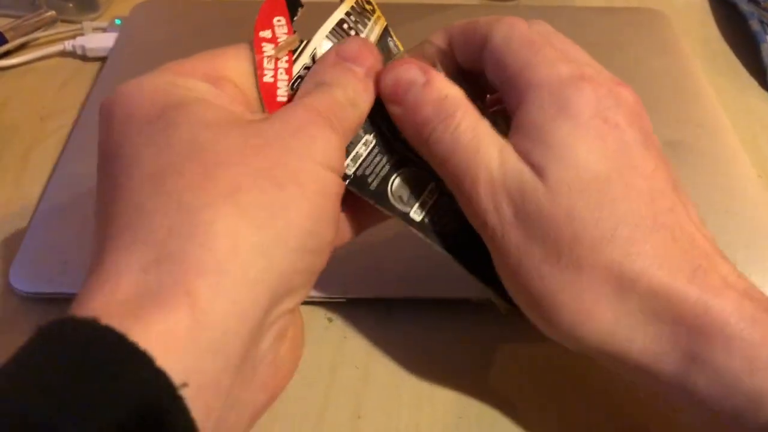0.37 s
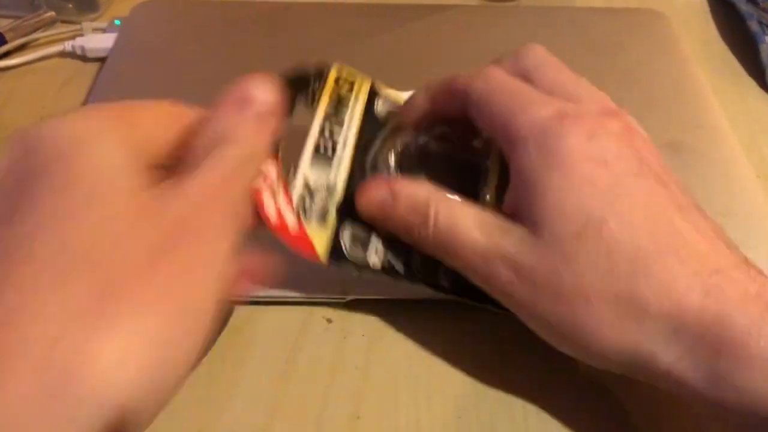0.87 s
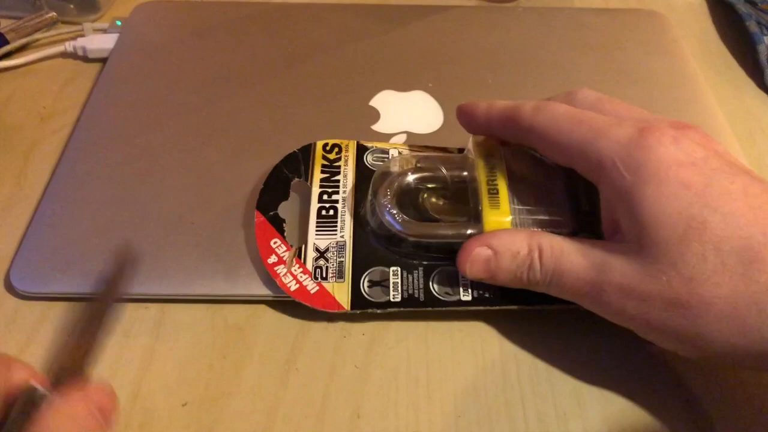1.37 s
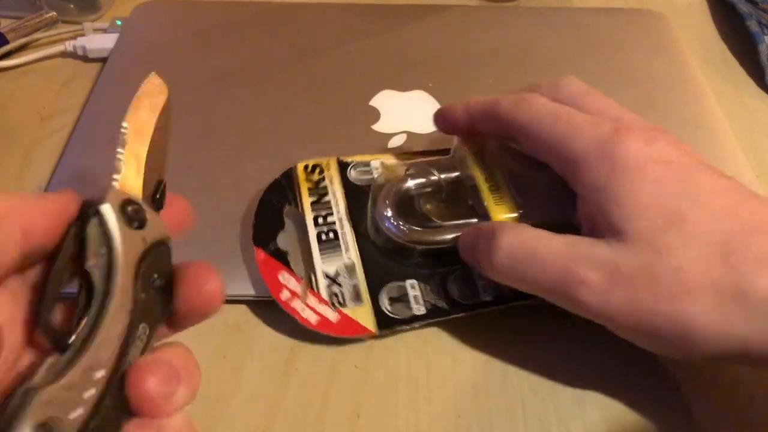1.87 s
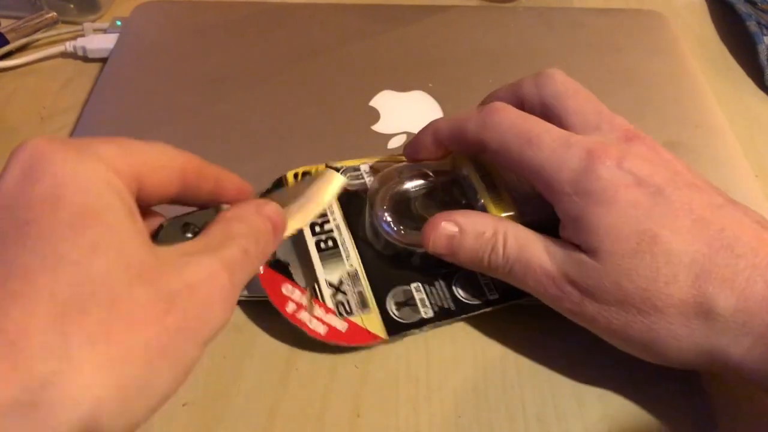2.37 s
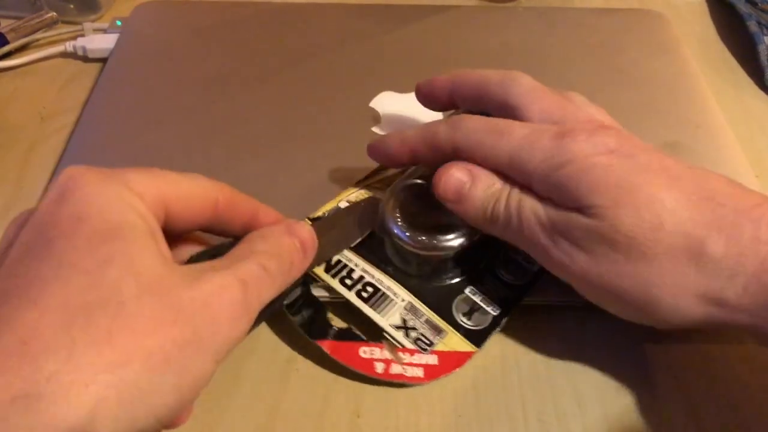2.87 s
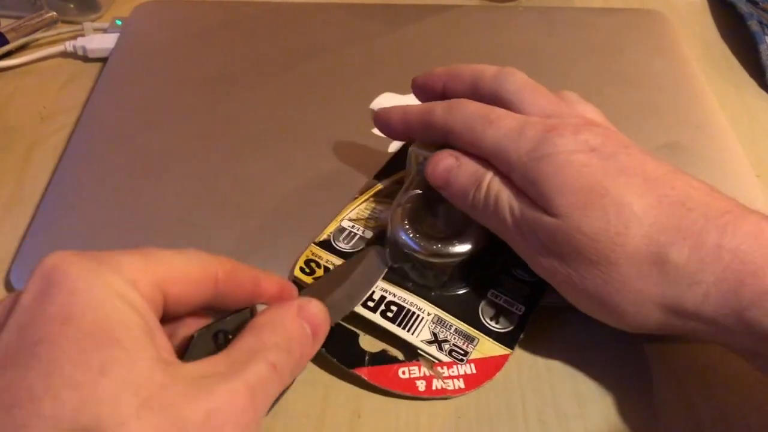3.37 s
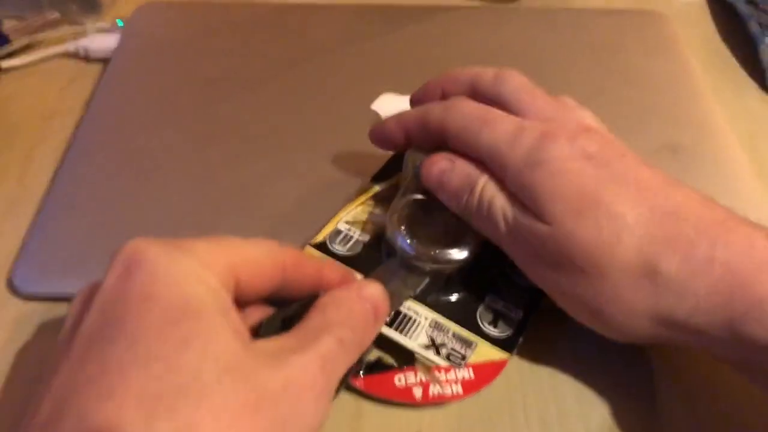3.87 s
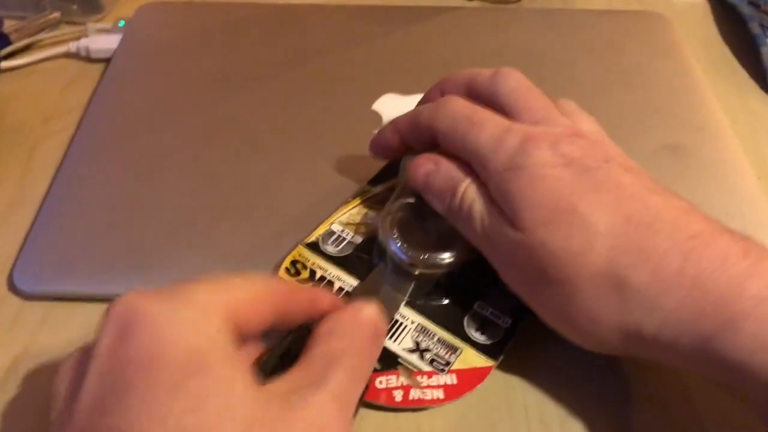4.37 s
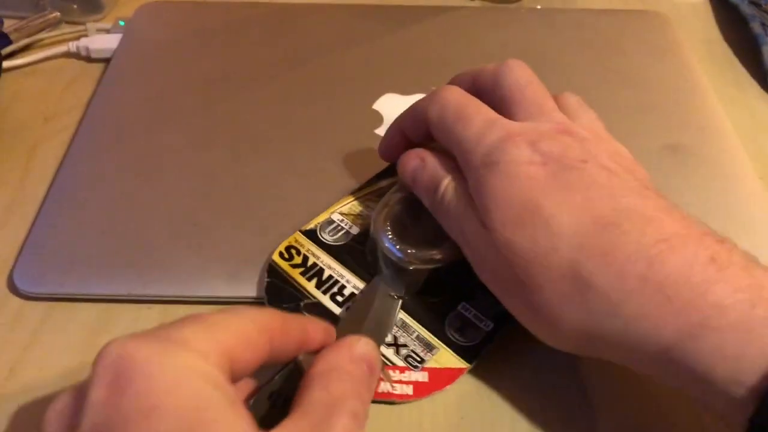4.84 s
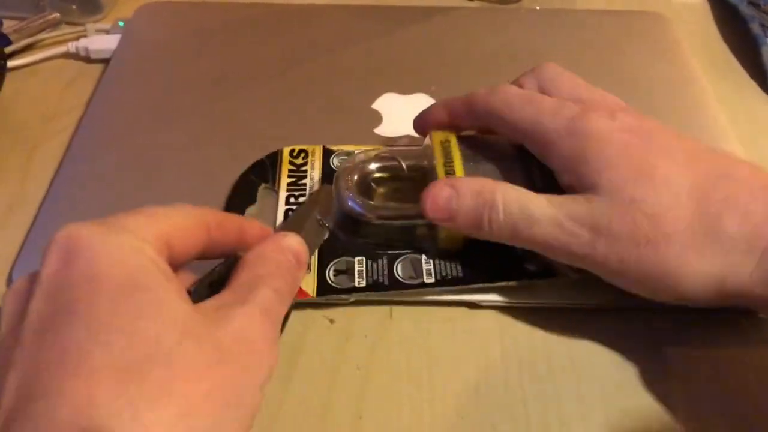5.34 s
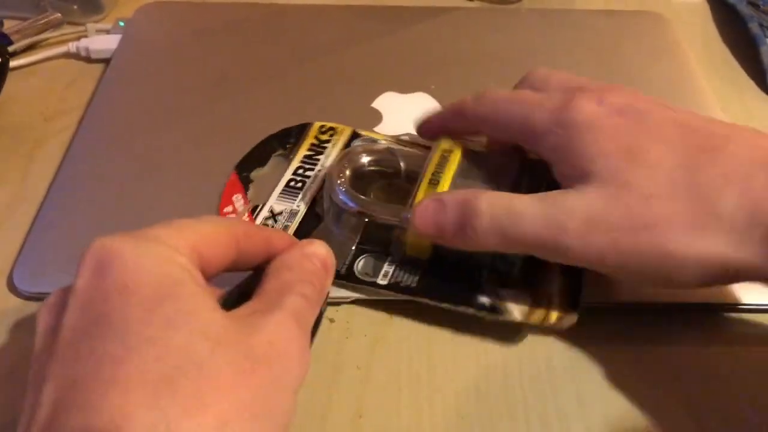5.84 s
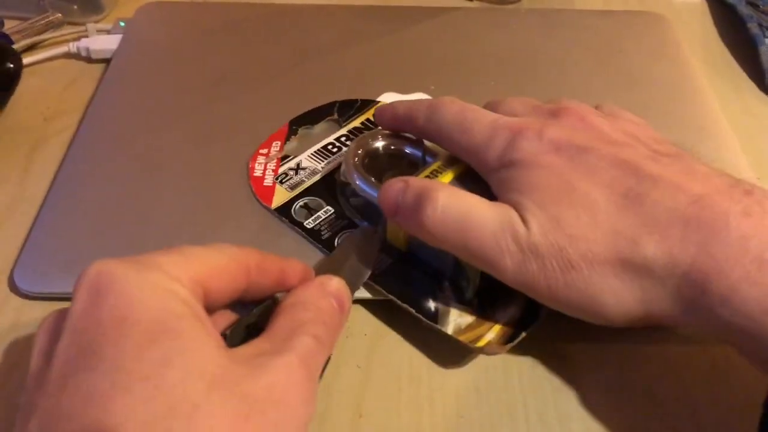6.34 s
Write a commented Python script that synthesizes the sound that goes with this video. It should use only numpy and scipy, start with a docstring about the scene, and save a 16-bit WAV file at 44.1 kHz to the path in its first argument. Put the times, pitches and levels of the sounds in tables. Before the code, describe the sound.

A close microphone in a small quiet room, with faint low background noise and a short soft echo. From 0 to 0.9 s hands bend a stiff plastic pack: light crackles, faint hiss and a strong snap at 0.5. At 1.05 it drops on a metal lid over a desk, a loud clack with thud, scuff and tiny steely rattle; small bumps and a creak follow around 1.3-1.5. From 1.5 to 2.4 it is nearly quiet, with faint rubbing and a barely audible distant low hum rising. Prying brings small clicks and hissing from 2.4 to 3.2, then very sharp snaps at 3.4 and 3.7, the latter with a rasp. Sawing strokes scrape and creak from 4.0 to 5.0, with a pop at 4.4. A dense cluster of loud cracks, knocks and scrapes comes at 5.4-5.8, then softer rasping, a last tick near 6.4 and fading rubbing.

```python
"""Sharp plastic snaps, hisses, creaks and dull knocks: a stiff blister pack holding a padlock is bent by hand,
dropped on a metal lid on a desk, then pried and sawn with a knife. Clicks make shell, lid, desk and lock ring;
dense random grains make the hiss of fingers and blade, and filtered noise makes the creaks.
A small quiet room answers with echoes made of dying noise; a distant low drone, nearly a sine, rises for a moment."""
import sys
import numpy as np
from scipy import signal
from scipy.fft import rfft, irfft
from scipy.io import wavfile

SR = 44100
rng = np.random.default_rng(int(sys.argv[2]) if len(sys.argv) > 2 else 0)


def store_pcm(level_fs):
    """Save levels as 16-bit WAV."""
    pcm = np.round(np.clip(level_fs, -1, 1) * 32767).astype(np.int16)
    wavfile.write(sys.argv[1], SR, np.atleast_2d(pcm).T)


def invert_db(level):
    """Linear amplitude ratio for a level in decibels (20 dB per decade), elementwise."""
    return 10 ** (np.asarray(level, dtype=float) / 20)


N = 285327  # length [samples]

# Modes are the pitches at which a body rings; a wider mode dies sooner.
# plastic shell, in three groups: (pitch [Hz], width [Hz], relative level [dB])
SHELL_LOW_MODES = [(844, 350, 4), (1070, 94, -5.5), (1288, 183, -2.5), (1516, 270, 1.5)]
SHELL_MIDDLE_MODES = [(1950, 260, -4), (2300, 360, -1.5), (2650, 274, -4.5), (3306, 227, -4.5),
                      (3965, 760, 3.5), (4800, 1400, -4.5)]
SHELL_TOP_MODES = [(5900, 1460, 5), (6970, 670, -3.5), (8150, 1120, 2), (9830, 1520, 3.5),
                   (11620, 1100, -4), (13000, 1200, -3), (13800, 680, -6), (15400, 830, -9.5)]
# metal lid, and the desk under it: (pitch [Hz], width [Hz], relative level [dB])
LID_MODES = [(456, 300, -0.5), (626, 77, -6), (729, 220, 1), (990, 260, 2.5), (1380, 130, -3)]
DESK_MODES = [(85, 41, -28.5), (133, 43, -2.5), (170, 120, 0), (209, 43.7, -0.5), (267.4, 50, -4.5),
              (320, 75, -4.5), (376, 46, -7)]


def rms_one(x):
    """Scale a sound to an rms (average strength) of 1."""
    return x / np.sqrt(np.mean(x ** 2) + 1e-20)


def in_time(rows):
    """Draw straight lines between the rows of a curve: each column gets a value at every sample."""
    s, *columns = np.transpose(rows)
    return [np.interp(np.arange(N) / SR, s, column) for column in columns]


def drift(rate_hz):
    """Slow random wandering with spread 1: noise through two equal low-pass steps."""
    r = np.exp(-80 * np.pi * rate_hz / SR)
    # computed at every 40th sample only; the first 2000 values let the filter settle
    noise = rng.standard_normal(N // 40 + 2002)
    slow = signal.lfilter([1], [1, -2 * r, r * r], noise)[2000:]
    return np.interp(np.arange(N) / 40, np.arange(len(slow)), rms_one(slow))


def highs(x, cut_hz):
    """Keep only the highs: a steep high-pass at cut_hz removes what lies below."""
    return signal.sosfilt(signal.butter(4, cut_hz, "high", fs=SR, output="sos"), x)


def ring(force, hz, width_hz):
    """A unit click sets a dying sine of about height 1 ringing."""
    r = np.exp(-np.pi * width_hz / SR)
    w = 2 * np.pi * hz / SR
    return signal.lfilter([0, np.sin(w)], [1, -2 * r * np.cos(w), r * r], force + 1e-18)


def strike(modes, times, peak_db, spread_s, scatter_db, tail_db, tail_s, near_hz=1.0, focus_db=0, lag_s=0):
    """Each blow reaches every mode with its own delay, sign and strength; a fine crackle dies away with it."""
    out = np.zeros(N)
    luck = rng.random((len(times), len(modes), 3))
    # modes far from the pitch of the struck spot get focus_db less per octave
    weight_db = np.array([db - focus_db * abs(np.log2(hz / near_hz)) + 0 * times for hz, width_hz, db in modes])
    weight_db -= 10 * np.log10(np.sum(invert_db(2 * weight_db), axis=0))  # the weights' powers add up to 1
    for k, (hz, width_hz, db) in enumerate(modes):
        late, sign, size = luck[:, k].T
        mode_db = peak_db + weight_db[k]

        # the crackle: noise that dies away after each blow
        blows = np.zeros(N)
        np.add.at(blows, np.minimum(times * SR, N - 1).astype(int), invert_db(mode_db + tail_db))
        dying = signal.lfilter([1], [1, -np.exp(-1 / (tail_s * SR))], blows + 1e-18)
        force = dying * rng.standard_normal(N) * np.sqrt(4 * np.pi * width_hz / SR)

        # the blow itself: one click
        slower = lag_s * np.log2(modes[-1][0] / hz)  # bending waves of low pitch arrive later
        at = np.minimum((times + slower + spread_s * late * late) * SR, N - 1).astype(int)
        click = np.sign(sign - 0.5) * invert_db(mode_db + scatter_db * (2 * size - 0.5))
        np.add.at(force, at, click)
        out += ring(force, hz, width_hz)
    return out


def scrape(modes, slips, patchy_db):
    """Each slip pushes each mode one way or the other; modes fade in and out as the contact moves; rms 1."""
    total = 0
    for hz, width_hz, db in modes:
        fading = invert_db(db + patchy_db * drift(14.0))
        total = total + fading * ring(slips * rng.choice([-1, 1], N), hz, width_hz)
    return rms_one(total)


def snaps(hiss_db):
    """A buckle cracks through the shell within about a millisecond; low modes start later."""
    # shell buckling: (time [s], level of the middle modes [dB], top modes above that [dB],
    # low modes above that middle level [dB], pitch of the panel [Hz])
    buckles = [(0.005, -41, 3.5, -3, 1810), (0.0373, -31.5, -14.5, -32, 4140), (0.0568, -38, 9, -29, 3520),
               (0.2053, -51.5, 11, -7, 2710), (0.24, -35, 6.5, -14, 2690), (0.2444, -37.5, 5, -6, 2580),
               (0.256, -25.5, 7, -13.5, 3270), (0.3562, -54, 7, -19, 3410), (0.372, -61.5, 16.5, -7, 4200),
               (0.464, -33.5, 1, -24, 2370), (0.516, -16.5, 2.5, -19.5, 4100), (0.712, -45, -8.5, -3, 3400),
               (0.847, -47.5, -4.5, -17.5, 2630), (0.8543, -33.5, 11, -9, 2100),
               (0.867, -47, 7.5, 10.5, 1920), (1.0261, -34.5, -10.5, 0, 1910),
               (1.051, -13, -6, -13.5, 2060), (1.091, -27.5, -11.5, -6, 3220),
               (1.342, -32.5, -11, -2, 3200), (1.233, -60, 16, -3, 4620), (1.389, -47.5, -15, 8, 1900),
               (1.416, -41.5, -15, 16.5, 1900), (1.642, -67.5, 22, -3, 2610), (2.046, -50.5, 6.5, 5, 2000),
               (2.327, -40.5, -3, -15, 3600), (2.418, -31.5, -8, 1, 1920), (2.452, -49, -11, -16, 2020),
               (2.488, -33, -13, -5.5, 1860), (2.588, -29, 3.5, -5, 1930), (2.599, -35.5, 2.5, 0, 1950),
               (2.721, -48, -13, 5.5, 2060), (2.822, -34, 3.5, -20, 2190), (2.882, -32.5, -4.5, -10, 1950),
               (2.959, -38.5, -14, -14, 3310), (3.047, -38.5, 2.5, -4.5, 3650),
               (3.192, -41.5, 16, 11.5, 2030), (3.405, -37, 4, 8, 2870), (3.4153, -12, 1.5, -3, 2930),
               (3.419, -44, 0.5, -7.5, 2060), (3.426, -40, 17, 1.5, 1980), (3.7, -8, 2, -9.5, 2370),
               (3.799, -28, -8.5, -21, 4000), (4.078, -30, -9, -12, 3770), (4.178, -42, -1, -3, 2540),
               (4.206, -28.5, 6, -5.5, 3660), (4.4058, -19.5, -11.5, -10.5, 3900),
               (4.414, -38, -1, -19, 2180), (4.739, -47, 3, -12, 3900), (4.884, -48, 8, -11, 3750),
               (5.045, -55, 9, -8, 3500), (5.153, -45, 11.5, 0, 3780), (5.29, -28.5, 5.5, -26, 3540),
               (5.34, -38, 8.5, -13, 3480), (5.36, -45.5, 13, 10, 2360), (5.466, -48, 10.5, 5, 3560),
               (5.495, -40.5, -11, -10, 2250), (5.535, -41.5, 12.5, 4, 3640), (5.5459, -17, 1, -10, 2270),
               (5.5548, -8, -5, -5.5, 2270), (5.603, -41, 12.5, -6, 3260), (5.6154, -36, 0.5, 9, 2450),
               (5.642, -34, 5.5, 5.5, 2350), (5.674, -13, -2.5, -0.5, 1990), (5.7068, -33, -3, -7, 2660),
               (5.791, -35.5, -10, -1, 2240), (5.892, -44, 13.5, 12.5, 2480),
               (5.9115, -36, 12.5, 5.5, 4160), (6.025, -30.5, -4, -9, 3350), (6.045, -33.5, 2, -1.5, 2430),
               (6.397, -45.5, -16, -9, 4830)]
    s, peak_db, top_db, low_db, panel_hz = np.vstack([buckles, crackles(hiss_db)]).T
    middle = strike(SHELL_MIDDLE_MODES, s, peak_db, spread_s=0.0012, scatter_db=1.5,
                    tail_db=-23.5, tail_s=0.0072, near_hz=panel_hz, focus_db=13.5)
    top = strike(SHELL_TOP_MODES, s, peak_db + top_db, spread_s=0.0016, scatter_db=3.5,
                 tail_db=-23.0, tail_s=0.0062)
    low = strike(SHELL_LOW_MODES, s + 0.00109, peak_db + low_db, spread_s=0.002044, scatter_db=-2.5,
                 tail_db=-14.5, tail_s=0.0047)
    return highs(middle + top, 1200) + highs(low, 650)


def crackles(hiss_db):
    """Small snaps at chance moments, in rows like the big buckles, as strong as fingers and blade work."""
    count = 55
    above_hiss_db, scatter_db = 14.5, 2.5
    top_mean_db, low_db = 0.5, -4.5  # relative to the middle modes
    when, size, top, pitch = rng.random((count, 4)).T
    s = when * (N - 1) / SR
    peak_db = hiss_db[(s * SR).astype(int)] + above_hiss_db + scatter_db * (2 * size - 1)
    return np.transpose([s, peak_db, top_mean_db * 2 * top, low_db + 0 * s, 2000 * (1 + pitch)])


def rubbing(fingers, slides):
    """Dense uneven stick-slip grains, clumped in time, drive the shell; the pressure rumbles in the desk."""
    low, middle, top, desk = fingers + slides
    sizes = invert_db(1.56 * np.minimum(rng.exponential(1, N), 5))
    grains = rng.random(N) < 12000 / SR  # about 12000 a second
    slips = sizes * grains * invert_db(0.86 * drift(80))
    slips = slips + invert_db(15.0) * (rng.random(N) < 45 / SR)  # now and then a burr catches with a tick

    # a stroke bends a smaller patch than a palm, so it has less bass
    deep = scrape(SHELL_LOW_MODES, slips, patchy_db=2.5)
    shell = fingers[0] * highs(deep, 520) + slides[0] * highs(deep, 790)
    shell = shell + middle * highs(scrape(SHELL_MIDDLE_MODES, slips, patchy_db=3.0), 1700)
    shell = shell + top * highs(scrape(SHELL_TOP_MODES, slips, patchy_db=4.0), 2600)

    pushes = rng.standard_normal(N) * invert_db(4.9 * drift(25))
    rumble = scrape(DESK_MODES + LID_MODES[:1], pushes, patchy_db=4.5)  # the lowest lid mode joins in
    return shell + desk * highs(rumble, 70)


def friction():
    """Gains of the low, middle, top and desk modes under fingers, and the same under single strokes."""
    # hands on the pack: (time [s], level of finger hiss on the shell [dB],
    # level of desk rumble under their pressure [dB])
    hands = [(0, -62, -56.5), (0.1, -69, -60), (0.3, -68, -66), (0.42, -73, -70.5), (0.7, -81, -72),
             (0.8, -68, -66.5), (1.02, -57.5, -60.5), (1.14, -71, -49), (1.23, -67, -67), (1.33, -64, -48),
             (1.5, -64.5, -57), (1.62, -79, -70), (1.76, -81, -72.5), (2.1, -77.5, -67.5),
             (2.37, -72.5, -72.5), (2.45, -58, -62.5), (2.72, -61, -64.5), (2.85, -61, -63),
             (3.08, -61.5, -61), (3.22, -70.5, -67), (3.5, -71.5, -60.5), (3.64, -73.5, -70),
             (3.85, -68.5, -51), (3.98, -70, -62), (4.25, -90, -65.5), (4.42, -73.5, -62.5),
             (4.6, -74.5, -62), (5.08, -66.5, -62), (5.5, -63.5, -60), (5.75, -63, -59), (6.2, -66, -61),
             (6.47, -81, -71)]
    hiss_db, desk_db = in_time(hands)
    pressure_db = desk_db - hiss_db
    low_db = hiss_db + 0.33 * pressure_db - 2  # the low modes partly follow the rumble
    top_db = hiss_db - 0.25 * pressure_db - 2.5  # pressure dulls the treble
    return invert_db(np.array([low_db, hiss_db, top_db, desk_db])), strokes()


def strokes():
    """Gains of the four mode groups: each stroke swells and stops as the blade speeds up and halts."""
    # single slides of blade or fingers: (start [s], end [s], level of the middle modes early [dB],
    # the same late [dB], top modes above those [dB])
    slide_rows = [(0.235, 0.253, -60, -59, 4), (0.708, 0.769, -58, -59, -9), (0.812, 0.989, -61, -59, 7),
                  (1.045, 1.124, -42.5, -60, -3), (1.342, 1.356, -44.5, -47.5, -14.5),
                  (1.382, 1.488, -59.5, -58, -3), (1.62, 1.72, -93, -87, 17),
                  (1.848, 2.074, -63, -63, -1.5), (2.139, 2.186, -65.5, -71.5, -7),
                  (2.264, 2.35, -74.5, -86, 2), (2.539, 2.65, -58, -71, -0.5),
                  (3.413, 3.441, -50.5, -48.5, -2), (3.431, 3.574, -58.5, -72, -15.5),
                  (3.712, 3.781, -36.5, -41, 1.5), (3.862, 3.993, -64.5, -75, -4.5),
                  (4.035, 4.1, -61.5, -52.5, -7), (4.162, 4.228, -58, -68, -3),
                  (4.265, 4.385, -70, -65, -8), (4.44, 4.546, -44.5, -44.5, -2),
                  (4.626, 4.741, -55, -50, -1), (4.781, 4.89, -48.5, -54, -2),
                  (4.903, 5.047, -49, -51, 1.5), (5.107, 5.432, -59.5, -61, 6),
                  (5.445, 5.533, -55.5, -52, -3), (5.532, 5.614, -39, -58.5, -4),
                  (5.616, 5.666, -41, -45.5, 0.5), (5.795, 6.011, -67.5, -56, 1.3),
                  (6.002, 6.218, -45, -59.5, -3), (6.226, 6.362, -66, -64.5, 0),
                  (6.457, 6.48, -65, -64, -8)]
    gains = 0
    for start, end, early_db, late_db, top_db in slide_rows:
        along = np.clip((np.arange(N) / SR - start) / (end - start), 0, 1)
        speed = (2 * along) ** 0.76 * (2 - 2 * along) ** 0.7
        # early and late levels belong to a quarter and three quarters of the way, before the speed factor
        swell = speed * invert_db(early_db + (late_db - early_db) * (2 * along - 0.5))
        group_db = [[-4 - 0.3 * top_db], [0], [top_db], [-20.5]]  # low, middle, top, desk
        gains = gains + swell * invert_db(np.array(group_db))
    return gains


def creaks():
    """While a panel is held bent, friction keeps its one resonance singing roughly."""
    # bent panels of shell or lid: (start [s], end [s], pitch [Hz], level [dB])
    bends = [(0.021, 0.205, 1640, -69), (0.064, 0.199, 2920, -72), (0.07, 0.16, 3750, -74),
             (0.72, 0.769, 3720, -58), (0.89, 0.958, 4130, -55.5), (1.337, 1.482, 376, -45.5),
             (1.378, 1.48, 210, -52), (1.424, 1.466, 1190, -36.5), (2.66, 3.054, 4600, -67),
             (3.724, 3.775, 1000, -41), (3.74, 3.77, 2470, -42), (3.867, 3.954, 395, -57),
             (4.454, 4.461, 1230, -35), (4.483, 4.541, 1240, -49.5), (4.473, 4.532, 3900, -50),
             (4.665, 4.72, 1290, -53), (4.776, 4.843, 2650, -49), (4.963, 5.025, 1325, -49.5),
             (5.312, 5.35, 3440, -54), (4.915, 5.03, 8300, -54), (5.432, 5.465, 480, -53),
             (5.536, 5.606, 1610, -47.5), (5.628, 5.652, 2430, -37), (5.717, 5.742, 1370, -47),
             (5.764, 5.825, 2050, -55), (6.042, 6.142, 3220, -55)]
    out = np.zeros(N)
    for start, end, hz, db in bends:
        first, last = int(start * SR), int(end * SR)
        length = last - first
        # noise through two resonances; the first 2000 samples let them settle
        rough = ring(rng.standard_normal(length + 2000), hz, 0.1 * hz + 25)
        rough = ring(rough, hz, 0.16 * hz + 40)[-length:]
        swell = np.abs(np.sin(np.linspace(0, np.pi, length))) ** 0.44
        out[first:last] += invert_db(db) * swell * rms_one(rough)
    return out


def knocks():
    """The lid rings first, the desk a few milliseconds later, so each knock falls in pitch."""
    # pack against lid and desk: (time [s], level of the lid modes [dB],
    # desk modes above that [dB], strongest desk pitch [Hz])
    bumps = [(0.948, -51.5, 18, 157), (1.051, -17, 1.5, 171), (1.065, -28.5, 8, 356),
             (1.101, -23, -12, 130), (1.303, -38.5, -15, 209), (1.388, -33, -15, 390), (1.413, -40, 7, 191),
             (1.427, -26.5, 3.5, 212), (1.448, -26.5, -12, 366), (1.455, -29, -7, 222),
             (2.421, -46.5, -11, 190), (2.514, -44, 3.5, 120), (2.618, -39.5, -7, 120),
             (2.907, -29.5, -32, 260), (3.415, -35, -2, 258), (3.428, -45.5, 25, 165), (3.678, -46, 9, 189),
             (3.703, -37, 3, 120), (3.876, -50, 20.5, 264), (3.916, -47, 10, 250),
             (4.331, -54.5, 20.5, 186), (4.579, -56.5, 21, 262), (5.207, -46.5, 1, 250),
             (5.22, -32.5, 4, 176), (5.228, -33.5, -7, 158), (5.364, -42.5, 1, 410),
             (5.428, -32.5, -0.5, 410), (5.496, -30, -27, 190), (5.553, -20.5, -8, 317),
             (5.675, -21.5, -9.5, 400), (5.777, -32.5, -10.5, 170), (5.878, -40, -18, 170),
             (5.997, -38, -8, 345)]
    s, peak_db, desk_db, desk_hz = np.transpose(bumps)
    lid = strike(LID_MODES, s, peak_db, spread_s=0.0011, scatter_db=4.0,
                 tail_db=-19.0, tail_s=0.015, lag_s=0.0015)
    desk = strike(DESK_MODES, s + 0.0022, peak_db + desk_db, spread_s=0.0021, scatter_db=-7.5,
                  tail_db=-20.5, tail_s=0.027, near_hz=desk_hz, focus_db=27.0, lag_s=0.0029)
    return highs(lid, 270) + highs(desk, 100)


def padlock():
    """The steel lock jolts inside its pocket and rings thinly."""
    # jolts of the lock: (time [s], level [dB])
    jolts = [(1.052, -35), (1.068, -34.5), (1.086, -43.5)]
    # ringing of its steel: (pitch [Hz], width [Hz], relative level [dB])
    steel_modes = [(7870, 80, -3), (9520, 80, -7), (11500, 110, -2), (13300, 110, -5), (15340, 100, -4)]
    s, peak_db = np.transpose(jolts)
    steel = strike(steel_modes, s, peak_db, spread_s=0.0072, scatter_db=10.0, tail_db=-5.0, tail_s=0.0055)
    return highs(steel, 5000)


def walls(x):
    """Countless small echoes: noise that builds up in a few milliseconds and dies away."""
    # room answer, a little longer in the middle treble:
    # (upper pitch limit [Hz], time to fall by 60 dB [s], level before that limit is applied [dB])
    tails = [(2000, 0.27, -15.5), (7000, 0.32, -19.5), (16000, 0.27, -22)]
    t, answer = np.arange(SR // 2) / SR, 0
    for cut_hz, t60, db in tails:
        echoes = rng.standard_normal(len(t)) * invert_db(-60 * t / t60) * (1 - np.exp(-t / 0.01))
        echoes *= invert_db(db) / np.sqrt(np.sum(echoes ** 2))
        low_pass = signal.butter(2, min(cut_hz, SR / 2.2), fs=SR)
        answer = answer + signal.lfilter(*low_pass, echoes)
    return signal.fftconvolve(x, answer)[:N]


def drone():
    """A near sine whose pitch climbs slowly overall, with small dips, fading in and out at its ends."""
    # distant drone: (time [s], pitch [Hz], level [dB])
    glide = [(1.45, 71.3, -75), (1.476, 71, -79), (1.692, 80.7, -62.5), (1.802, 84.5, -85), (1.83, 83, -69),
             (1.972, 85.2, -61), (2.078, 90.2, -73), (2.198, 88.6, -64), (2.3, 85.0, -78)]
    hz, db = in_time(glide)
    start, end = glide[0][0], glide[-1][0]
    fade, = in_time([(start - 0.05, 0), (start, 1), (end, 1), (end + 0.059, 0)])
    return np.sqrt(2) * invert_db(db) * fade * np.sin(2 * np.pi * np.cumsum(hz) / SR)


def air():
    """Steady room and microphone noise: white noise coloured by a curve over pitch."""
    # colour of the noise: (pitch [Hz], relative level per Hz [dB])
    colour_rows = [(30, 8), (60, 5.5), (100, 6.5), (230, -9.5), (500, -4.5), (1200, -22), (3000, -30),
                   (8000, -18), (15000, -25)]
    curve_hz, curve_db = np.transpose(colour_rows)
    hz = np.fft.rfftfreq(N, 1 / SR) + 1
    colour = invert_db(np.interp(np.log(hz), np.log(curve_hz), curve_db))
    noise = irfft(rfft(rng.standard_normal(N)) * colour, N)
    return invert_db(-69.5) * rms_one(noise)


def scene():
    """Pack, lock, lid and desk with their room answer, then drone and air."""
    fingers, slides = friction()
    hiss_db = 20 * np.log10(fingers[1] + slides[1])
    near = snaps(hiss_db) + knocks() + padlock() + rubbing(fingers, slides) + creaks()
    return (near + walls(near) + drone() + air())[None]


def roll_off(x):
    """The treble ends steeply here."""
    return signal.sosfilt(signal.butter(12, 17020, fs=SR, output="sos"), x)


def record(dry):
    """A small microphone cuts the deep bass."""
    mix = signal.sosfilt(signal.butter(2, 45, "high", fs=SR, output="sos"), dry)
    return roll_off(mix)


dry = scene()
out = record(dry)
store_pcm(out)
```